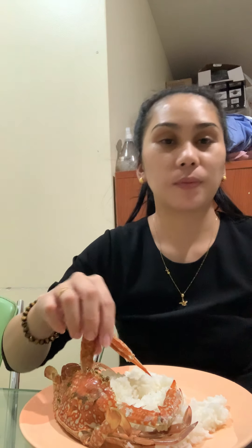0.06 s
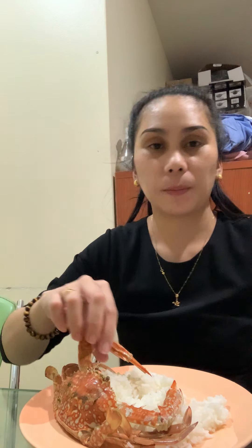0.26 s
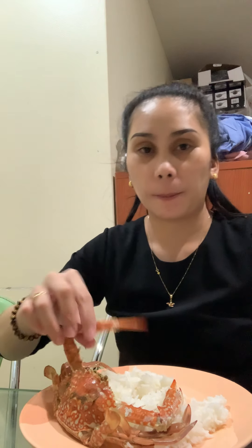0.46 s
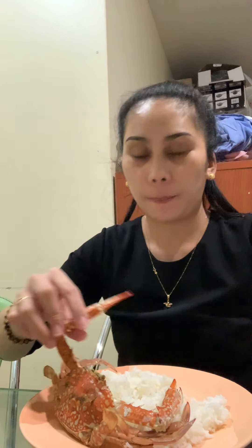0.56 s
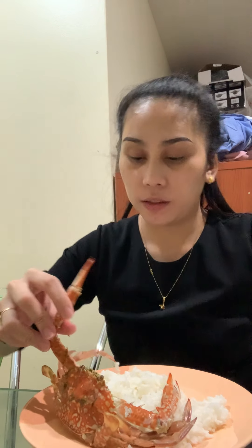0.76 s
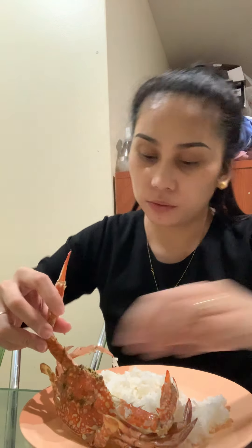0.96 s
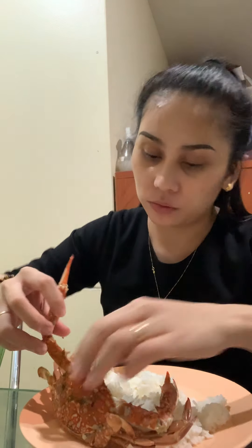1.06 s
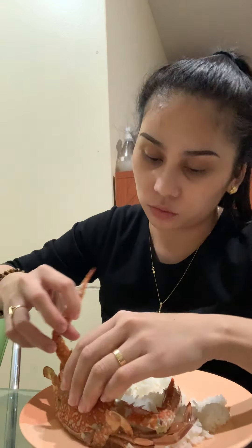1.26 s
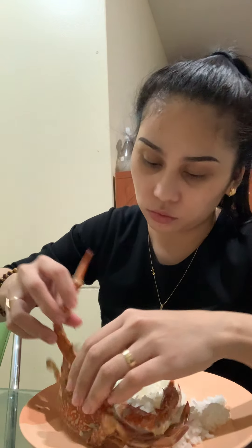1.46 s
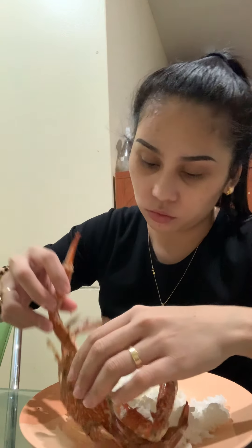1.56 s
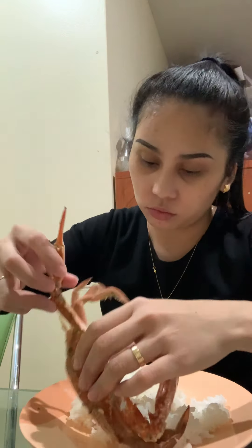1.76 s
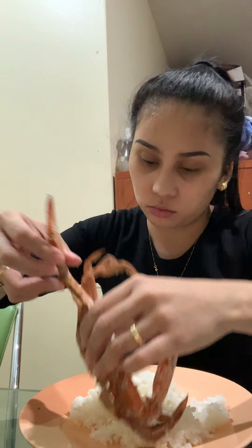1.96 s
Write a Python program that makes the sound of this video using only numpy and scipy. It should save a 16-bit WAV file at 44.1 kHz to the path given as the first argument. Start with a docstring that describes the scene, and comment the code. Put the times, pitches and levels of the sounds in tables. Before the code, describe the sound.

Crab shell knocks hard twice on a plate, with a low table thump under each; then sparse faint snaps, ticks and soft rubs. Close microphone in a bare, echoing room with quiet appliance rumble.

```python
"""Crab shell on a plate

A hard crab shell knocks twice against a plate and table; faint ticks, snaps and grainy rubs are its handling.
A knock is a downward sweep plus splinter noise and the modes of shell and plate; a snap is two mode clusters
and a tick; a rub is dense random grains. Low table modes swell under the two knocks. A bare, hard-walled room
answers by convolution with decaying noise. An appliance rumbles as filtered noise and hums and whines as
wavering sines."""
import sys
import numpy as np
from scipy import signal
from scipy.fft import rfft, irfft
from scipy.io import wavfile

SR = 44100
rng = np.random.default_rng(int(sys.argv[2]) if len(sys.argv) > 2 else 0)


def master_out(mix):
    """Clip the mix to full scale and print it as 16-bit PCM to the path in sys.argv[1]."""
    frames = np.transpose(np.atleast_2d(mix))
    ceiling = np.clip(frames, -1, 1)
    pcm = np.round(ceiling * 32767).astype(np.int16)
    wavfile.write(sys.argv[1], SR, pcm)


def how_loud(loudness_db):
    """Turn decibels into a plain amplitude multiplier (0 dB gives 1, 20 dB gives 10)."""
    steps = np.asarray(loudness_db, float) / 20
    return 10 ** steps


N = 88200   # samples in the scene
ONSET_S = 0.00033   # linear rise of splinter noise and snaps


# Modes of shell and plate ringing together.
# Each row: frequency in Hz, relative level in dB, t60 in seconds (before the cap LONGEST_RING_S).
BODY_MODES = [(346.8, 4.5, 0.16), (466.7, -9.5, 0.14), (688, -11.5, 0.1), (832, -3.5, 0.1), (967, -1, 0.12),
              (1160, -11.5, 0.27), (1358, -14, 0.16), (1560, -4.5, 0.086), (2130, -3, 0.05),
              (2678, -3.5, 0.026), (3190, -13.5, 0.14), (3563, -29.5, 0.081)]
LATE_CYCLES, SWELL_CYCLES = 2.2, 0.32   # delay and swell, in periods of each pitch
LONGEST_RING_S, UNEVEN_DB = 0.11, 1.5   # cap on t60; random spread of mode levels per blow
BODY_DB, BODY_TO_ROOM_DB = -5, -11.5    # ringing against the crack; share of it that the room hears
CRACK_DB, CRACK_CYCLES = -6.5, 52       # splinter noise at its start; its t60 in periods of the centre pitch


def knock(centre_hz, octaves):
    """Dispersion and modal ringing: a down-swept crack, splinter noise and body modes; (direct, to the room)."""
    t = np.arange(SR // 4) / SR
    colour = bell(centre_hz, octaves)
    impulse = 1.0 * (t == 0)
    crack = coloured(impulse, colour, late_cycles=LATE_CYCLES)
    crack = crack / np.abs(crack).max() * (t < 0.1)

    hz, db, t60 = np.transpose(BODY_MODES)[:, :, None]
    since = np.maximum(t - LATE_CYCLES / hz, 0)   # low modes start later
    swell = 1 - np.exp(-since * hz / SWELL_CYCLES)
    decay = how_loud(-60 * since / np.minimum(t60, LONGEST_RING_S))
    uneven_db = UNEVEN_DB * rng.standard_normal(hz.shape)
    polarity = rng.choice([-1, 1], hz.shape)
    strength = colour(hz) * how_loud(db + uneven_db) * polarity
    modes = strength * swell * decay * np.sin(2 * np.pi * hz * since)
    rings = how_loud(BODY_DB) * modes.sum(0)

    noise = rms_one(coloured(rng.standard_normal(len(t)), colour))
    splinter_decay = how_loud(CRACK_DB - 60 * t * centre_hz / CRACK_CYCLES)
    splinter = splinter_decay * np.minimum(t / ONSET_S, 1) * noise
    return crack + splinter + rings, crack + how_loud(BODY_TO_ROOM_DB) * rings


# Parts of the hard knocks.
# Each row: start in seconds, peak of the crack in dB, centre in Hz, width in octaves, room share in dB.
KNOCKS = [(0.2471, -19, 1860, 0.74, -1), (0.2475, -31, 355, 0.41, -4), (0.2477, -36.5, 9900, 0.54, -1),
          (.2490, -21.5, 1296, 1.04, 4), (0.5718, -23.5, 1630, 1.08, -1), (.5728, -33.5, 350, 0.49, -4),
          (0.575, -19.5, 2980, 1.044, 4), (.5752, -24, 10400, 0.42, -7.5), (0.5788, -24, 1280, 1.1, 3.5),
          (0.6, -26, 4560, 0.55, 0.5)]


def knocks():
    """Superposition of impacts: closely timed parts, each in its own band, make up the knocks."""
    return place([(s, db, room_db, knock(hz, octaves)) for s, db, hz, octaves, room_db in KNOCKS])


SNAP_SPREAD_OCTAVES, SNAP_OCTAVES = 0.2, 0.33   # reach of a mode cluster; width of its colour in the room
SECOND_RING_DB = -2.5   # second cluster against the first
SNAP_TICK_DB, TICK_OVER_RING, TICK_OCTAVES, TICK_T60_S = -13, 1.3, 0.7, 0.012


def snap(main_hz, second_hz, t60):
    """Brittle fracture excites two clusters of short modes and a tick; the room hears a coloured click."""
    t = np.arange(SR // 10) / SR
    tick_colour = bell(TICK_OVER_RING * main_hz, TICK_OCTAVES)
    tick = rms_one(coloured(rng.standard_normal(len(t)), tick_colour))
    near = how_loud(SNAP_TICK_DB - 60 * t / TICK_T60_S) * tick
    spread = rng.uniform(-0.94, 1, (2, 7, 1))   # seven modes in each cluster
    for hz, db, offsets in zip((main_hz, second_hz), (0, SECOND_RING_DB), spread):
        mode_hz = hz * 2 ** (SNAP_SPREAD_OCTAVES * offsets)
        modes = np.sin(2 * np.pi * (mode_hz * t + 7 * offsets))   # scattered phases
        near = near + how_loud(db - 60 * t / t60) * modes.sum(0) / np.sqrt(7)
    near = near * np.minimum(t / ONSET_S, 1)
    near = near / np.abs(near).max()

    first, second = bell(main_hz, SNAP_OCTAVES), bell(second_hz, SNAP_OCTAVES)
    second_gain = how_loud(SECOND_RING_DB) * np.sqrt(main_hz / second_hz)
    impulse = 1.0 * (np.arange(len(t)) == 100)
    click = coloured(impulse, lambda hz: first(hz) + second_gain * second(hz))
    return near, rms_one(click) * np.std(near)


# Small snaps and ticks. Each row: start in seconds, peak level in dB, main ring in Hz,
# second ring in Hz, room share in dB, t60 in seconds.
SNAPS = [(0.228, -60.5, 1840, 6200, 19, 0.019), (0.24, -38, 1430, 1920, -20, 0.048),
         (0.347, -49, 7200, 5620, -19, 0.03), (.555, -69, 8900, 12000, -19, .015),
         (0.5667, -47, 1500, 1900, -10, .06), (1.083, -47, 2940, 5180, -4.5, 0.021),
         (1.0848, -41.5, 2130, 890, -6.5, 0.051), (1.248, -61, 3160, 4810, -13, 0.03),
         (1.6186, -41.5, 3945, 2570, -5.5, 0.034), (1.62, -56.5, 1372, 938, -8.5, 0.049),
         (1.6218, -52, 1933, 5130, -8.5, 0.029), (1.6316, -55, 4000, 2590, -2, 0.032),
         (1.748, -56, 6430, 5280, -4.5, 0.011), (1.981, -60.5, 11600, 5500, -10, .008)]


def snaps():
    """Superposition of small fractures, each with its own pair of rings."""
    return place([(s, db, room_db, snap(main_hz, second_hz, t60))
                  for s, db, main_hz, second_hz, room_db, t60 in SNAPS])


RUB_GRAINS_PER_S, RUB_ROOM_DB = 2200, 0.5


def rub(length_s, centre_hz, octaves):
    """Friction as a random pulse train: dense uneven grains under a quick swell and fade."""
    t = np.arange(SR // 4) / SR
    grains = (rng.random(len(t)) < RUB_GRAINS_PER_S / SR) * rng.standard_normal(len(t))
    grains = rms_one(coloured(grains, bell(centre_hz, octaves)))
    out = grains * np.minimum(t / 0.004, 1) * np.exp(-(t / length_s) ** 2)
    return out, out


# Soft rubs of shell on plate. Each row: start in seconds, fade length in seconds,
# rms level of the grains before swell and fade in dB, centre in Hz, width in octaves.
RUBS = [(0.992, 0.023, -66, 1270, 1.17), (1.09, 0.02, -74, 4960, 0.61), (1.778, 0.011, -67, 2800, 0.39),
        (1.81, 0.05, -66, 1036, 0.46)]


def rubs():
    """Superposition of short frictional contacts."""
    return place([(s, db, RUB_ROOM_DB, rub(length_s, hz, octaves)) for s, length_s, db, hz, octaves in RUBS])


# Booms of the table top under the hard knocks. Each row: start in seconds, level in dB.
THUMPS = [(0.2473, -36), (0.5703, -36)]
# Modes of the table top. Each row: frequency in Hz, level within a boom in dB, t60 in seconds.
TABLE_MODES = [(77.1, -10, 0.51), (119, -8, 0.45), (184, -11.5, 0.13), (269.5, -16.5, 0.66)]
THUMP_RISE_S = 0.016


def table():
    """Modal response of the table: low modes swell after a knock and decay exponentially."""
    out = np.zeros(N)
    for s, db in THUMPS:
        t = np.maximum(np.arange(N) / SR - s, 0)
        swell = 1 - np.exp(-(t / THUMP_RISE_S) ** 2)
        for hz, mode_db, t60 in TABLE_MODES:
            decay = how_loud(db + mode_db - 60 * t / t60)
            out += decay * swell * np.sin(2 * np.pi * hz * t)
    return out


# Colour of the room tail. Each row: frequency in Hz, relative level in dB.
ROOM_COLOUR = [(60, -36.5), (200, -22.5), (400, 13), (1000, 3), (2500, 1.5), (6000, -1), (15000, 4.5)]
# Decay of the room tail. Each row: frequency in Hz, t60 in seconds.
ROOM_T60 = [(60, 0.85), (160, 1), (420, 0.49), (1100, 0.51), (2900, 0.45), (7700, 0.43), (15000, 0.13)]
ROOM_DB, FIRST_ECHO_S, BUILD_S = -2, 0.0063, 0.0013


def room(x):
    """Reverberation by convolution: dense reflections build up at the first echo and die band by band."""
    t = np.maximum(np.arange(SR) / SR - FIRST_ECHO_S, 0)
    tail = np.zeros(SR)
    for hz, band in bands(SR):
        tail += how_loud(at_hz(ROOM_COLOUR, hz) - 60 * t / at_hz(ROOM_T60, hz)) * band
    build_up = 1 - np.exp(-t / BUILD_S)
    tail = tail * build_up / np.sqrt(SR * 0.03)
    return how_loud(ROOM_DB) * signal.fftconvolve(x, tail)[:N]


# Spectrum of the appliance rumble. Each row: frequency in Hz, relative level per Hz in dB.
RUMBLE = [(18, -46), (30, -21), (65, -12), (102, -9), (228, -19), (404, -20), (567, -28.5), (716, -31.5),
          (2370, -44.5), (2700, -39.5), (15000, -56)]
# Sway of the low middle. Each row: time in seconds, level in dB (only the rise above the lowest row counts).
SWAY = [(0.0, -74.5), (0.24, -68), (0.46, -67.5), (0.59, -62.5), (0.8, -68), (1.07, -63), (1.25, -71.5),
        (1.44, -73.5), (2.0, -72)]
RUMBLE_DB = -65.5   # rms before the sway
RUMBLE_PATCHY_DB, PATCHES_PER_S = 1.2, 6   # spread and corner rate of the patchiness


def rumble():
    """Broadband noise shaped in third octaves: patchy below 1500 Hz, swaying from 150 to 900 Hz."""
    sway_db = np.interp(np.arange(N) / SR, *np.transpose(SWAY))
    sway_db = sway_db - sway_db.min()
    steady, swaying = np.zeros((2, N))
    for hz, band in bands(N):
        patchy_db = RUMBLE_PATCHY_DB * (hz < 1500) * drift(PATCHES_PER_S)
        band = how_loud(at_hz(RUMBLE, hz) + patchy_db) * band
        steady += band
        swaying += band * how_loud(sway_db * (150 < hz < 900))
    return how_loud(RUMBLE_DB) / np.std(steady) * swaying


# Appliance hum. Each row: frequency in Hz, rms level before wavering in dB.
HUM = [(49, -79.5), (99, -71), (199, -79), (301, -79), (399, -84.5), (500, -85.5)]
# Appliance whine. Each row: frequency in Hz, rms level before wavering in dB.
WHINE = [(2709, -96), (2777, -87), (2843, -96)]
HUM_WAVER_DB, WHINE_WAVER_DB, WAVER_PER_S = 3, 1, 5   # spreads and shared corner rate


def hum_and_whine():
    """Line spectrum with random amplitude modulation: steady pitches of wavering level."""
    t = np.arange(N) / SR
    out = np.zeros(N)
    for lines, waver_db in ((HUM, HUM_WAVER_DB), (WHINE, WHINE_WAVER_DB)):
        for hz, db in lines:
            level = np.sqrt(2) * how_loud(db + waver_db * drift(WAVER_PER_S))
            out += level * np.sin(2 * np.pi * (hz * t + rng.random()))
    return out


def place(blows):
    """Linear superposition of (start s, dB, room share dB, sounds): direct path and feed to the room."""
    direct, sent = np.zeros((2, N + SR))
    for s, db, room_db, (near, far) in blows:
        i = int(s * SR)
        direct[i:i + len(near)] += how_loud(db) * near
        sent[i:i + len(far)] += how_loud(db + room_db) * far
    return np.stack([direct[:N], sent[:N]])


def bell(centre_hz, octaves):
    """Resonance-like weighting: a Gaussian on the octave scale, never narrower than 0.2 octave."""
    return lambda hz: np.exp(-0.5 * (np.log2(hz / centre_hz) / max(octaves, 0.2)) ** 2)


def coloured(x, colour, late_cycles=0):
    """Filtering and dispersion by spectrum: weight by colour(Hz), delay each pitch by late_cycles periods."""
    hz = np.maximum(np.arange(len(x) // 2 + 1) * SR / len(x), 30)
    phase = -2 * np.pi * late_cycles * np.log(hz)   # its slope is a delay of late_cycles / hz
    return irfft(rfft(x) * colour(hz) * np.exp(1j * phase), len(x))


EDGES_HZ = 36 * 2 ** np.arange(0, 9.1, 1 / 3)


def bands(length):
    """Filter-bank analysis of white noise: third-octave bands of equal power per Hz, with their centres."""
    white = rng.standard_normal((2, length + 4000))   # neighbouring bands use different noise
    out = []
    for k, (low, high) in enumerate(zip(EDGES_HZ, EDGES_HZ[1:])):
        band_pass = signal.butter(2, [low, high], "band", fs=SR, output="sos")
        band = signal.sosfilt(band_pass, white[k % 2])[4000:]   # skip the filter's start
        out.append((np.sqrt(low * high), band))
    return out


def drift(rate):
    """Low-pass random process of rms 1: two equal poles at rate Hz, computed every 40 samples."""
    r = np.exp(-80 * np.pi * rate / SR)
    noise = rng.standard_normal(N // 40 + 2002)
    slow = signal.lfilter([1], [1, -2 * r, r * r], noise)[2000:]
    return np.interp(np.arange(N) / 40, np.arange(len(slow)), rms_one(slow))


def at_hz(points, hz):
    """Interpolation on the logarithmic frequency axis."""
    table_hz, values = np.transpose(points)
    return np.interp(np.log(hz), np.log(table_hz), values)


def rms_one(x):
    """Power normalisation: scale to rms 1."""
    return x / np.sqrt(np.mean(x ** 2) + 1e-20)


def scene():
    """Superposition of the shell's direct sound, its room tail, the table and the appliance."""
    direct, sent = knocks() + snaps() + rubs()
    return (direct + room(sent) + table() + rumble() + hum_and_whine())[None]


def low_pass(x):
    """Removes everything above the highest recorded frequency."""
    return signal.sosfilt(signal.butter(12, 16810, fs=SR, output="sos"), x)


MIC_LOW_CUT_HZ, MIC_STOP_HZ = 36, 16900   # bass corner; treble is 70 dB down from here up


def record(dry):
    """Band limiting: the microphone cuts the lowest bass and the top."""
    low_cut = signal.butter(3, MIC_LOW_CUT_HZ, "high", fs=SR, output="sos")
    top_cut = signal.cheby2(12, 70, MIC_STOP_HZ, fs=SR, output="sos")
    mix = signal.sosfilt(np.vstack([low_cut, top_cut]), dry)
    return low_pass(mix)


dry = scene()
out = record(dry)
master_out(out)
```